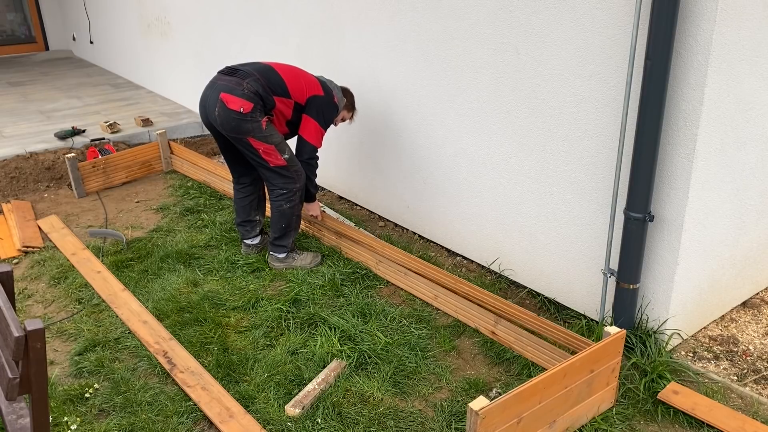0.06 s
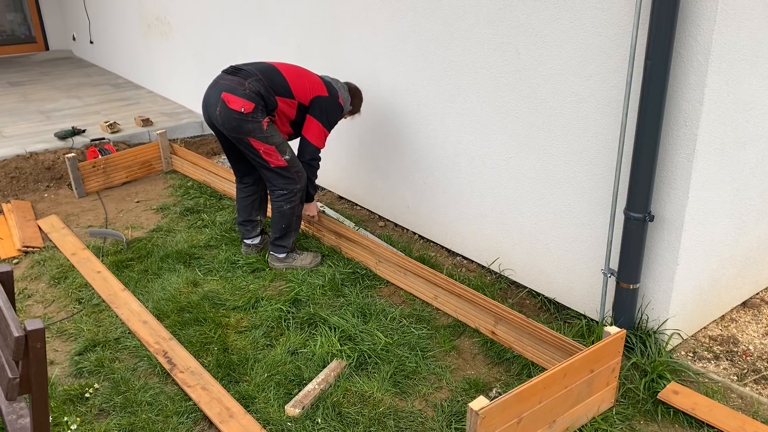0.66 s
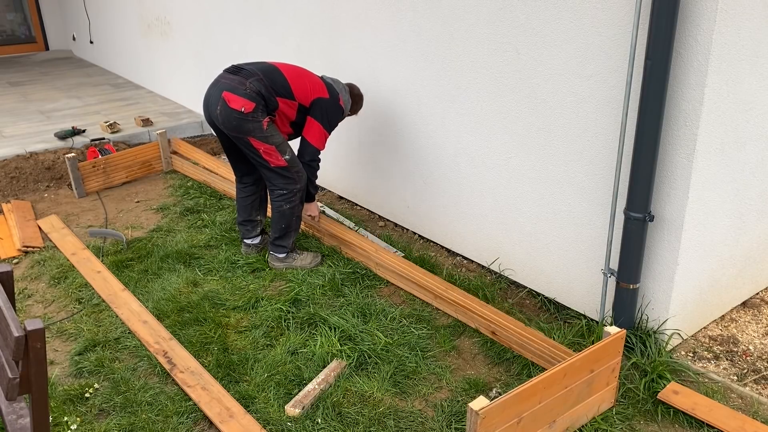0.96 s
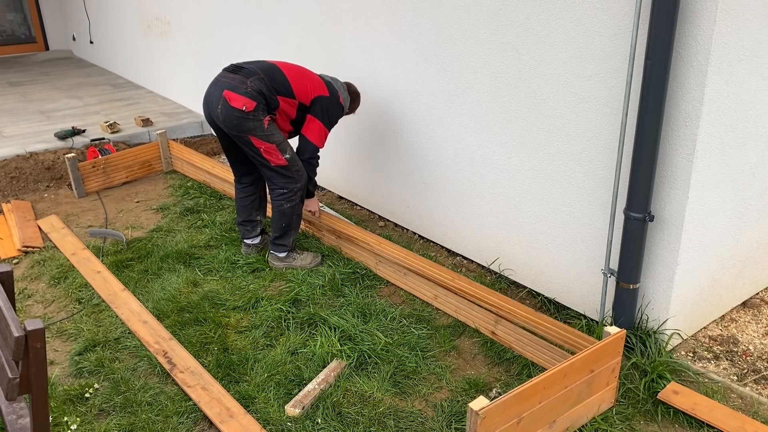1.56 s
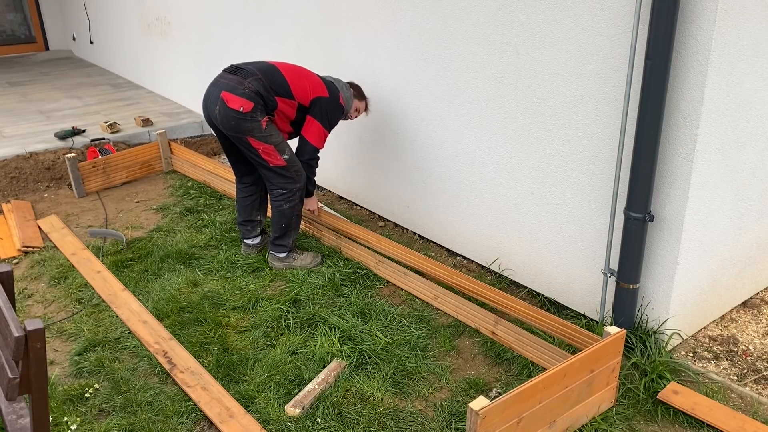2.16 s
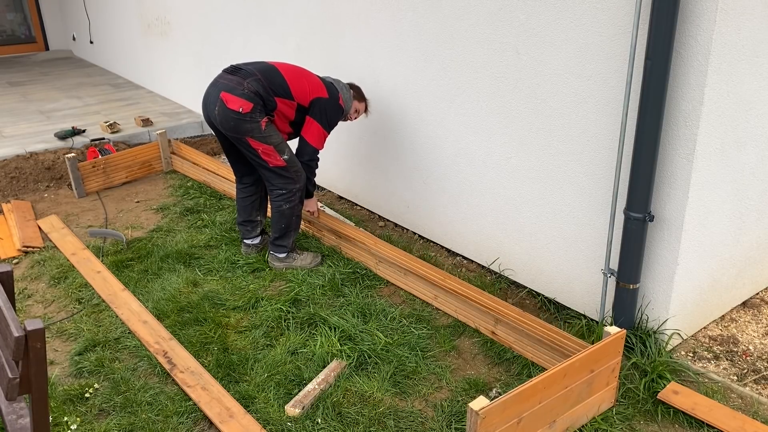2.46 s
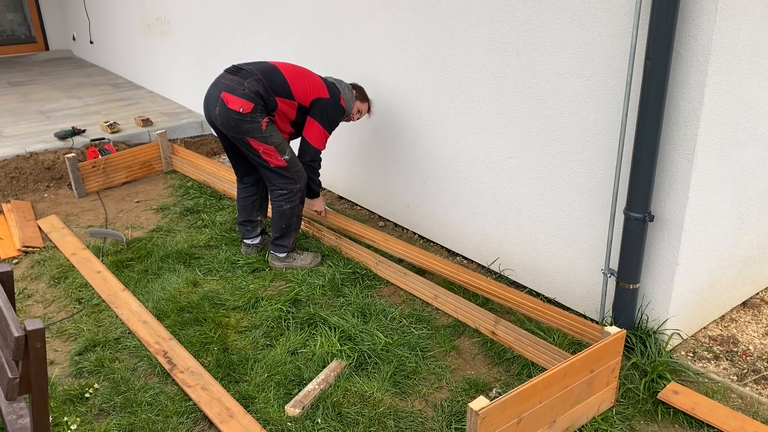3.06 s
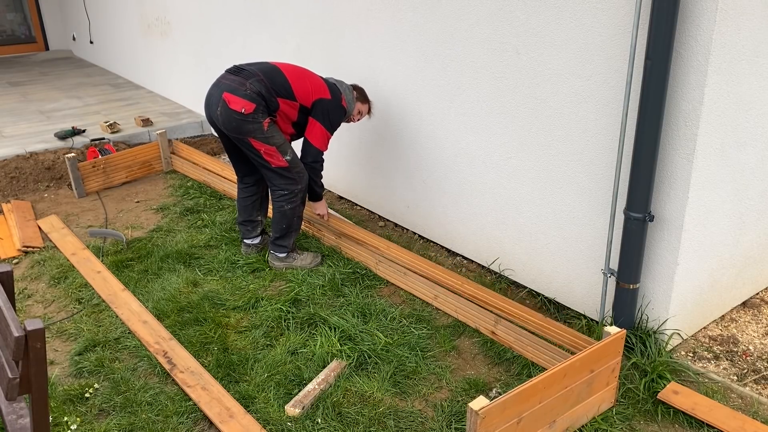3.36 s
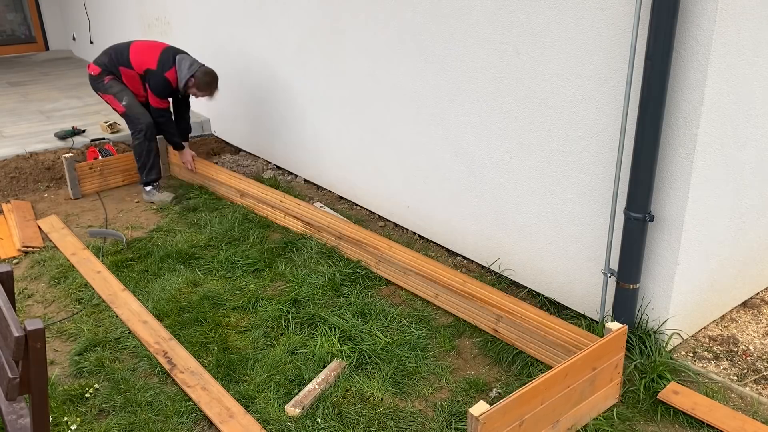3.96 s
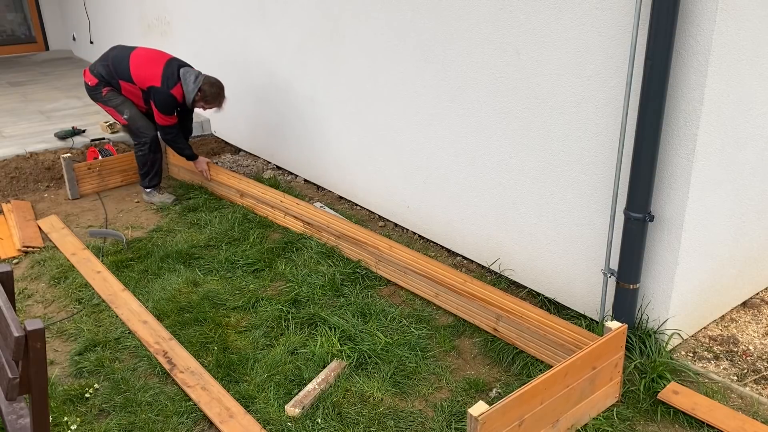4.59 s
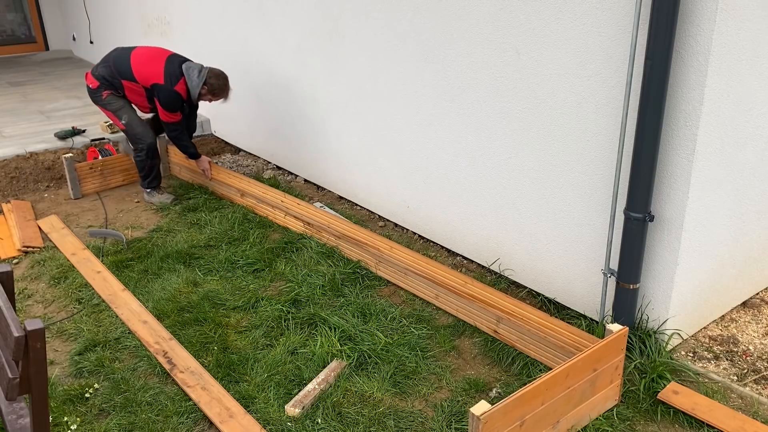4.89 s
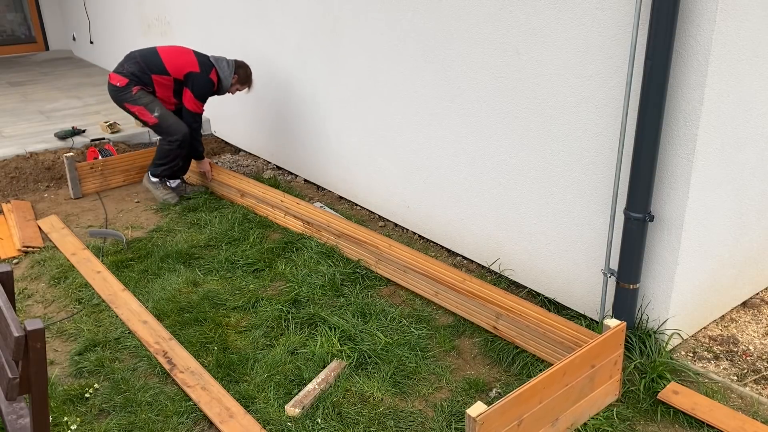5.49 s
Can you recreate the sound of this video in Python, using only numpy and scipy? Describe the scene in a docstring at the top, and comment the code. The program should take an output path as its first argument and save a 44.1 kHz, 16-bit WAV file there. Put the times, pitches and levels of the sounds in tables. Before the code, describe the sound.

A wooden plank scrapes, knocks and slaps against other boards outdoors, then clothes rustle over a low hum and distant traffic.

```python
"""On a lawn beside a house wall, a long wooden plank is slid and knocked into a garden frame.
It scrapes and squeaks as it sticks and slips, rattles against the other boards, slaps down and lands.
Each bump makes the wood ring, and the wall and yard echo it. After a brief dip in level, work clothes
and grass rustle while a machine hums nearby. Far traffic hisses and rumbles throughout."""
import sys
import numpy as np
from scipy import signal
from scipy.fft import rfft, irfft
from scipy.io import wavfile

SR = 44100
rng = np.random.default_rng(int(sys.argv[2]) if len(sys.argv) > 2 else 0)


def materialize(psi):
    """Save the field psi as 16-bit PCM at rate SR to the path in sys.argv[1].

    A 1-D psi becomes a single channel; in a 2-D psi each row is a channel.
    """
    bounded = np.clip(np.atleast_2d(psi).T, -1, 1)
    quanta = np.round(bounded * 32767).astype(np.int16)
    wavfile.write(sys.argv[1], SR, quanta)


N = 248283
TIME = np.arange(N) / SR
DIP_S, DIP_FADE_S, DIP_DB = 3.945, 0.043, -22  # the level dips briefly here; hum and rustle follow
CRISP_HZ = 8650  # the crisp top treble starts here

# Bumps on other boards: t/s, level/dB, top f/Hz, bottom f/Hz, clack share (0-1), first bounce/dB
PLANK_BUMPS = [(.111, -35, 300, 150, 0.3, -7.5), (.238, -38.5, 418, 160, 0.4, -3),
               (.268, -38, 397, 119, 0.5, -3), (.293, -32.5, 190, 110, 0.46, -7),
               (.318, -35.5, 900, 141, 0.07, -14), (.352, -39.5, 348, 160, .2, -11),
               (.414, -38, 500, 200, 0.14, -4), (.712, -25.5, 160, 72, .5, -12),
               (.746, -33, 800, 130, .05, -4), (1.028, -27.5, 1100, 260, 0.03, -13),
               (1.047, -27, 564, 270, 0.3, -20), (1.199, -35.5, 910, 220, .05, 1),
               (1.418, -33, 260, 199, .35, -20), (1.474, -45, 480, 380, .1, -6),
               (3.208, -42, 280, 190, .35, -10)]
# Notes the plank rings at as it bends and twists (wider ones die sooner): f/Hz, width/Hz, level/dB
PLANK_NOTES = [(68, 39, 2), (88, 28, 7.5), (165, 44, 1.5), (199.3, 27.5, 4), (230, 40, 3), (276, 50, 2.5),
               (336, 35, 1), (384, 25, 2.5), (473.5, 38, 0.5), (549, 49, -7), (601, 17, -7.5),
               (648, 15, -9.5), (700, 67, -10), (812, 38, -6), (875, 30, -0.5), (932, 32, -3),
               (1033, 24, -2), (1094, 45, -0.5), (1256, 51, -6.5), (1317, 60, -2), (1370, 78, -6.5),
               (1650, 93, -1), (1790, 110, -5), (2040, 110, -6), (2600, 180, -15)]
KNOCK_TRAVEL_MS = 0.53  # time a 1 kHz wave takes along the plank
def plank_knocks(gap_s=0.0235, loss_db=6.0, softening=0.58):
    """The plank bumps and bounces, each bounce weaker and duller than the last; slaps ring it too."""
    touches = []
    for s, db, top_hz, low_hz, clack_share, bounce_db in PLANK_BUMPS:
        touches.append((s, db, top_hz, low_hz, clack_share))
        for k in range(3):
            bounce_s = s + gap_s * (k + 1 + rng.uniform(-0.13, 0.118))
            duller_hz = top_hz * softening ** (k + 1)
            touches.append((bounce_s, db + bounce_db - loss_db * k, duller_hz, low_hz, clack_share))
    # just after a slap the plank rings between 297 and 1480 Hz
    touches += [(s + 0.006, ring_db, 1480, 297, 0) for s, _, ring_db in END_SLAPS]
    return knocks(touches, PLANK_NOTES, KNOCK_TRAVEL_MS, chatter_db=-9, chatter_s=0.068)


# The far end slaps down: t/s, crack level/dB, ringing level/dB
END_SLAPS = [(0.9844, -17, -24), (1.8195, -39, -36)]
# Tone of the crack: f/Hz, level/dB
SLAP_TONE = [(150, -20), (250, 1.5), (360, 5), (550, -4), (780, -6), (1050, -4.5), (1450, -0.5), (1900, -4),
             (2400, -17), (2900, -26.5), (3400, -47), (6000, -64)]
def slaps(return_db=-12, ringing_db=-4.0, size=8192):
    """A crack runs along the plank as a falling chirp, comes back once, weaker, and rings the wood."""
    out, hz = np.zeros(N), frequencies(size)
    paths = bending(hz, travel_ms=8.0) + from_db(return_db) * bending(hz, travel_ms=21)
    chirp = irfft(from_db(at_hz(SLAP_TONE, hz)) * paths, size)[:size // 2]
    chirp = butter(chirp, 150, "high")
    ring = resonate(chirp, PLANK_NOTES)
    crack = as_blow(as_blow(chirp) + from_db(ringing_db) * as_blow(ring))
    for s, crack_db, _ in END_SLAPS:
        add(out, s, from_db(crack_db) * crack)
    return out


# The plank touches down in the frame: t/s, level/dB, top f/Hz, bottom f/Hz, clack share (0-1)
FRAME_LANDINGS = [(3.173, -38.5, 383, 190, 0.2), (3.184, -32.5, 130, 45, 0.25),
                  (3.188, -41, 1200, 600, 0.12), (3.766, -27, 754, 560, .4), (3.7751, -21, 480, 400, .12),
                  (3.7835, -22, 420, 170, 0.3), (3.791, -32.5, 1600, 950, 0.15), (3.8, -30, 480, 140, 0.5),
                  (3.822, -34.5, 450, 220, .6), (3.833, -33.5, 260, 150, .5), (3.852, -37, 640, 380, .1),
                  (3.864, -43, 170, 70, .5), (3.884, -48, 250, 100, .6)]
# Notes of the frame boards resting on the ground: f/Hz, width/Hz, level/dB
FRAME_NOTES = [(63, 14, 8.5), (161, 23, 4.5), (244, 57, -1.5), (287, 32, 3.5), (381, 28, -1), (438, 81, -3),
               (488, 58, 2), (588, 26, -3.5), (656, 40, -9), (820, 91, -10), (876, 48, -9), (949, 35, -3.5),
               (1075, 35, -18), (1226, 74, -9), (1396, 76, -17), (1590, 45, -6), (1950, 150, -22),
               (2320, 550, -17)]
def frame_knocks():
    """The plank lands on a corner, an edge, then its face; waves cross the short frame boards fast."""
    return knocks(FRAME_LANDINGS, FRAME_NOTES, travel_ms=0.14, chatter_db=-15, chatter_s=0.05)


# The plank hits the board beside it: t/s, level/dB, top f/Hz, bottom f/Hz
BOARD_HITS = [(.997, -33, 620, 280), (1.046, -35.5, 1000, 330), (1.222, -45, 600, 220),
              (1.417, -46, 400, 300), (1.492, -47, 650, 453)]
# Notes of that board: f/Hz, width/Hz, level/dB
BOARD_NOTES = [(229, 9, -3), (341, 16, -1), (382, 8, 3), (486, 11, -2), (597, 8, -1), (652, 8, 1),
               (690, 16, -2), (808, 14, -6), (878, 10, -5), (1032, 14, -1), (1088, 18, -3), (1323, 24, 3),
               (1664, 40, 1)]
def board_knocks():
    """The board standing on edge beside the plank rings on after it is hit."""
    touches = [(*hit, 0) for hit in BOARD_HITS]  # all ring, no clack
    return knocks(touches, BOARD_NOTES, KNOCK_TRAVEL_MS, chatter_db=-17, chatter_s=0.03)


# Pushes of wood over wood: peak t/s, hiss level/dB, rise/s, fall/s, judder above hiss/dB, deep share (0-1)
PLANK_PUSHES = [(0.263, -50.5, 0.19, 0.18, 4.5, 0.84), (0.429, -48.5, 0.05, 0.18, -5, 0.25),
                (.70, -50, 0.061, 0.052, -9, 0.05), (0.756, -48.5, 0.083, 0.084, 6.5, 0.91),
                (1.04, -49.5, 0.037, 0.11, -15, .5), (1.105, -51, 0.11, 0.1, -24, 0.9),
                (1.224, -54, 0.048, 0.055, 10.5, 0.76), (1.34, -58.5, 0.074, 0.15, 3.5, 0.32),
                (2.195, -52.5, 0.11, 0.13, -6.5, 0.5), (3.05, -62.5, 0.23, 0.16, 5, 0.15),
                (3.205, -54.5, 0.038, 0.091, 0.5, 0.67), (3.54, -67.5, 0.52, 0.14, -5, 0.1),
                (3.73, -57.5, 0.08, .04, -1, 0.4), (3.785, -45.5, 0.029, 0.099, 6, 0.95)]
# An edge catches and creaks: middle t/s, half length/s, level/dB, bottom f/Hz
EDGE_CREAKS = [(0.175, 0.0052, -46, 1400), (0.238, .008, -47, 1200), (0.26, .009, -50, 1400),
               (0.318, 0.01, -50, 900), (.415, .007, -53.5, 1100), (0.443, .008, -53, 1100),
               (0.663, .005, -53, 1510), (.687, .006, -45, 990), (0.722, .004, -49, 910),
               (0.754, 0.0094, -43, 1000), (1.336, 0.015, -55, 1400), (2.149, 0.033, -54.5, 1290),
               (2.21, 0.02, -54.5, 1900), (3.043, 0.046, -62.5, 1400), (3.779, .008, -42.5, 1200),
               (3.835, 0.011, -54, 700), (4.026, 0.013, -56, 1190), (5.026, .005, -48.5, 1000),
               (5.54, .045, -55.5, 1410)]
# Notes of the scraped edge: f/Hz, width/Hz, level/dB
EDGE_NOTES = [(1070, 18, -4), (1394, 330, 0.5), (1705, 67, 3), (1883, 147, 0), (2595, 113, -5),
              (2720, 76, -12.5), (2946, 82, -8.5), (3210, 230, -15.5)]
def scrapes():
    """Sticking and slipping rings the edge; under weight the whole plank joins in with a deep judder."""
    light, heavy = tiny_slips(per_s=330, size_db=3.5, hiss=0.14)
    heavy = butter(butter(heavy, 380, "low", order=1), 120, "high")
    bright = butter(light, 960, "high")
    edge_force, deep_force = np.zeros(N), np.zeros(N)
    for s, db, rise_s, fall_s, judder_db, deep_share in PLANK_PUSHES:
        judder = from_db(db + judder_db) * stroke(s, rise_s, fall_s) ** 1.22  # grows faster than the hiss
        edge_force += np.sqrt(1 - deep_share) * judder * bright
        deep_force += np.sqrt(deep_share) * judder * heavy
    catching, _ = tiny_slips(per_s=1100, size_db=2.0, hiss=0.067)
    for s, half_s, db, low_hz in EDGE_CREAKS:
        swell = np.exp(-np.minimum(((TIME - s) / half_s) ** 2, 40) / 2)
        edge_force += from_db(db) * swell * butter(catching, low_hz, "high")
    edge_force = butter(edge_force, 4200, "low", order=4)  # soft wood rounds off each slip
    edge = resonate(edge_force, EDGE_NOTES) / np.std(resonate(light, EDGE_NOTES))
    body = resonate(deep_force, PLANK_NOTES) / np.std(resonate(heavy, PLANK_NOTES))
    return edge + body


# Tone of wood sliding on wood: f/Hz, level/dB
SLIDE_TONE = [(200, 25), (500, 15.5), (1000, 20), (1800, -1), (2700, 5), (4000, 0.5), (7200, 1),
              (9000, -25), (10600, -8.5), (13200, -12), (15000, -34)]
def sliding():
    """The hiss of rubbing wood follows each push."""
    power = sum((from_db(db) * stroke(s, rise_s, fall_s)) ** 2
                for s, db, rise_s, fall_s, *_ in PLANK_PUSHES)
    return rubbing(SLIDE_TONE, waver_db=2.0, per_s=1200, size_db=0.5, hiss=1.0) * np.sqrt(power)


# A tight corner squeaks: middle t/s, half length/s, level/dB, f/Hz
CORNER_SQUEAKS = [(0.231, 0.0043, -44, 1750), (.559, 0.0038, -54, 2500), (0.691, 0.0081, -47, 1330),
                  (.743, 0.0039, -53, 2580), (.765, 0.01, -49, 2690)]
# Notes in a squeak: multiple of its pitch, width/Hz, level/dB
SQUEAK_NOTES = [(1, 220, 1), (1.17, 300, -8)]
def squeaks(slip_hz=440, wobble=0.4):
    """A tight corner slips fast and unevenly, and rings at a pitch set by where it jams."""
    cycles = np.cumsum(slip_hz * (1 + wobble * drift(120))) / SR
    slips = np.diff(np.floor(cycles), prepend=0) * from_db(3.2 * drift(200))  # one click a cycle
    out = np.zeros(N)
    for s, half_s, db, hz in CORNER_SQUEAKS:
        notes = [(hz * multiple, width, note_db) for multiple, width, note_db in SQUEAK_NOTES]
        ring = rms_one(butter(resonate(slips, notes), [0.75 * hz, 1.3 * hz], "band"))
        swell = np.exp(-np.minimum(((TIME - s) / half_s) ** 4, 40))
        out += from_db(db) * swell * ring
    return out


# Splinters and grit snap: t/s, level/dB, extra top treble/dB
SPLINTER_SNAPS = [(.172, -53, -6), (0.247, -60, -4), (.304, -62, -3), (.335, -64, 7), (0.448, -60, -5),
                  (.556, -51.5, -17), (0.721, -44.5, 1), (.994, -51, 8), (1.033, -53, 8), (1.415, -59.5, 3),
                  (3.2, -60, 5), (3.767, -41.5, -5), (3.7916, -46, 9), (4.942, -63, 10), (5.028, -57, -6),
                  (5.205, -58.5, 14), (5.422, -65, 17)]
# Tone of a snap: f/Hz, level/dB
SNAP_TONE = [(1500, -15), (2800, 12.5), (5000, 5.5), (7000, 10), (9000, -15.5), (12000, 0.5), (15500, -23)]
def snaps(fade_s=0.034, rise_s=0.001097, size=4096):
    """Short bright cracks where edges catch; the smallest splinters are the crispest."""
    out, t = np.zeros((2, N)), TIME[:size]
    for s, db, crisp_db in SPLINTER_SNAPS:
        tone = [(hz, tone_db + crisp_db * (hz > CRISP_HZ)) for hz, tone_db in SNAP_TONE]
        crack = spread(rng.standard_normal((2, size)), tone, NEARBY_WIDTH)
        add(out, s - rise_s, crack * from_db(db - 60 * t / fade_s) * (1 - np.exp(-t / rise_s)))
    return out


# Swishes of clothes and grass: peak t/s, level/dB, rise/s, fall/s, extra top treble/dB
CLOTH_SWISHES = [(3.968, -64, 0.069, .09, -2), (4.038, -58, 0.056, 0.11, -1), (4.10, -63.5, .07, .11, -3),
                 (4.29, -62, 0.13, .14, 0), (4.378, -58, 0.15, 0.088, 6.5), (4.705, -58, 0.15, 0.12, 2),
                 (4.775, -58.5, 0.084, 0.12, -16), (4.958, -61, .025, 0.088, 8),
                 (4.992, -62.5, 0.071, 0.14, 15.5), (5.028, -53, 0.055, 0.11, -2),
                 (5.103, -58.5, 0.11, 0.12, 4), (5.34, -64.5, 0.33, 0.12, -5), (5.43, -62, 0.15, 0.14, 7.5),
                 (5.515, -57.5, 0.064, 0.16, 6.5), (5.575, -70.5, 0.081, 0.088, 18),
                 (5.625, -60.5, 0.049, .1, 11)]
# Tone of the rustle: f/Hz, level/dB
RUSTLE_TONE = [(500, -45), (1800, 18.5), (3000, 9.5), (4500, 1.5), (7000, 2), (9000, -23), (10600, -5.5),
               (12000, -3.5), (13700, -8), (15200, -32)]
def rustling(stir_db=-73):
    """Cloth and grass swish with each movement, crispest where it is fastest."""
    soft_power = (from_db(stir_db) * (TIME > DIP_S)) ** 2  # faint rustle between the swishes
    crisp_power = 0
    for s, db, rise_s, fall_s, crisp_db in CLOTH_SWISHES:
        speed = stroke(s, rise_s, fall_s)
        soft_power += (from_db(db) * speed) ** 2
        crisp_power += (from_db(db + crisp_db) * speed ** 1.18) ** 2
    fibres = rubbing(RUSTLE_TONE, waver_db=1.5, per_s=1500, size_db=1.8, hiss=0.85)
    soft = butter(fibres, CRISP_HZ, "low", order=4) * np.sqrt(soft_power)
    crisp = butter(fibres, CRISP_HZ, "high", order=4) * np.sqrt(crisp_power)
    return soft + crisp


def wall_echo(x, delay_s=0.00367, echo_db=-13.0, low_hz=424):
    """The house wall throws the sound back from the side."""
    late = np.interp(TIME - delay_s, TIME, butter(x, low_hz, "high", order=1))
    return from_db(echo_db) * late * np.array([[1], [-1]])


# How long the yard echoes: f/Hz, time to fade by 60 dB/s
YARD_FADE = [(100, 0.47), (400, 0.29), (1000, 0.19), (2500, 0.096), (10000, 0.098)]
# Stereo width of nearby sounds and their echoes: f/Hz, side above middle/dB
NEARBY_WIDTH = [(100, -10.5), (250, -13), (700, -4.5), (1300, -8.5), (2400, -5), (4400, -2.5), (7200, -7),
                (9000, 0), (11000, -14)]
def yard_echoes(x, echo_db=-10.5, build_s=0.004, size=24000):
    """Echoes from the walls and fence gather after a blow and die away, the treble first."""
    t, edges_hz = TIME[:size], np.geomspace(50, 15000, 11)
    noise = spread(rng.standard_normal((2, size)), [(50, 0), (15000, 0)], NEARBY_WIDTH)
    tail = 0
    for low, high in zip(edges_hz, edges_hz[1:]):
        fade_s = at_hz(YARD_FADE, np.sqrt(low * high))
        tail += butter(noise, [low, high], "band") * from_db(-60 * t / fade_s)
    tail = rms_one(tail * (1 - np.exp(-t / build_s))) / np.sqrt(size)
    return from_db(echo_db) * signal.fftconvolve(x, tail, axes=1)[:, :N]


# Tones of the machine: f/Hz, level/dB
HUM_TONES = [(53.8, -52), (67.3, -64), (134.6, -55), (202, -70.5)]
def machine_hum():
    """A fan and a compressor turn at different speeds; their low tones throb from the dip onwards."""
    tones = sum(from_db(db + 0.5 * drift(7.2)) * np.sin(2 * np.pi * hz * TIME + 0.1 * drift(1.8))
                for hz, db in HUM_TONES)
    return np.sqrt(2) * tones * (TIME > DIP_S)


# Tone of the traffic rumble: f/Hz, level/dB
RUMBLE_TONE = [(22, -11), (33, -15), (45, 11), (58, 9), (90, 9.5), (120, -2.5), (170, -6.5), (300, -62.5)]
# Rumble between surges, before the dip: t/s, level/dB
RUMBLE_BASE = [(0.0, -55.5), (0.47, -50.5), (1.76, -50.5), (2.16, -48), (2.79, -52), (3.17, -51.5),
               (3.56, -56.5), (3.9, -49)]
# Tone of the tyre hiss: f/Hz, level/dB
TYRE_TONE = [(90, -28), (160, 1), (260, 2), (400, -2), (700, -1), (1200, -3), (1850, -1), (2500, -9.5),
             (3200, -17.5), (4300, -30), (7000, -40.5), (9000, -53), (12000, -50), (15000, -52)]
# Stereo width of the traffic: f/Hz, side above middle/dB
TRAFFIC_WIDTH = [(60, -13), (120, -7.5), (200, -5), (380, -4), (700, 7), (1290, 6), (2380, -7.5),
                 (4400, -4.5), (8000, 12), (13000, -1)]
def traffic(late_rumble_db=-55, surge_db=2.0, far_db=-61.5, near_db=-56.5, approach_s=3.22):
    """Far traffic rumbles in surges, and its tyre hiss swells as it comes nearer."""
    base_db = np.where(TIME < DIP_S, np.interp(TIME, *np.transpose(RUMBLE_BASE)), late_rumble_db)
    rumble_db = base_db + surge_db * np.abs(drift(1.8))
    nearness = (1 + np.tanh(TIME - approach_s)) / 2
    tyres_db = far_db + (near_db - far_db) * nearness
    rumble = spread(rng.standard_normal((2, N)), RUMBLE_TONE, TRAFFIC_WIDTH)
    tyres = spread(rng.standard_normal((2, N)), TYRE_TONE, TRAFFIC_WIDTH)
    return rumble * from_db(rumble_db) + tyres * from_db(tyres_db + 0.74 * drift(22))


def knocks(touches, notes, travel_ms, chatter_db, chatter_s, chatter_per_s=700, size=16384):
    """Each touch clacks, chatters briefly and rings the wood; a harder one reaches a higher pitch."""
    out, t = np.zeros(N), TIME[:size]
    tap = signal.unit_impulse(size)
    each_note = np.array([(-1) ** k * resonate(tap, [note]) for k, note in enumerate(notes)])
    for s, db, top_hz, low_hz, clack_share in touches:
        # the spot that is struck favours some notes over others
        ringing = rfft(from_db(2.5 * rng.standard_normal(len(notes))) @ each_note)
        chatter = rng.standard_normal(size) * (rng.random(size) < chatter_per_s / SR)
        force = tap + chatter * from_db(chatter_db - 60 * t / chatter_s)
        wave = rfft(force) * bending(frequencies(size), travel_ms)
        clack_and_ring = irfft(np.array([wave, wave * ringing]), size)
        clack, ring = butter(butter(clack_and_ring, top_hz, "low"), low_hz, "high")
        clack = butter(butter(clack, top_hz, "low"), low_hz, "high", order=1)
        blow = np.sqrt(clack_share) * as_blow(clack) + np.sqrt(1 - clack_share) * as_blow(ring)
        add(out, s, from_db(db) * blow)
    return out


def resonate(force, notes):
    """A force rings all the notes of an object at once; every second one is flipped in sign."""
    out = 0
    for k, (hz, width, db) in enumerate(notes):
        r = np.exp(-np.pi * width / SR)  # share of the swing left after one sample
        poles = [1, -2 * r * np.cos(2 * np.pi * hz / SR), r * r]
        out += (-1) ** k * from_db(db) * (1 - r * r) / 2 * signal.lfilter([1, 0, -1], poles, force)
    return out


def bending(hz, travel_ms):
    """A bending wave carries the treble ahead of the bass; 1 kHz takes the given time."""
    return np.exp(-4j * np.pi * travel_ms * np.sqrt(hz / 1000))


def tiny_slips(per_s, size_db, hiss):
    """Two streams of tiny slips of uneven size over a smooth hiss."""
    sizes = from_db(size_db * np.minimum(rng.exponential(1, (2, N)), 4)) * rng.choice([-1, 1], (2, N))
    slips = sizes * (rng.random((2, N)) < per_s / SR)
    return rms_one(slips) + hiss * rng.standard_normal((2, N))


def rubbing(tone, waver_db, per_s, size_db, hiss):
    """A crowd of tiny slips whose strength wavers as the surfaces catch."""
    return spread(tiny_slips(per_s, size_db, hiss), tone, NEARBY_WIDTH) * from_db(waver_db * drift(41))


def stroke(peak_s, rise_s, fall_s, range_db=19.5):
    """One movement swells to 1 and dies away, changing by range_db over its rise and its fall."""
    away = np.maximum((peak_s - TIME) / rise_s, (TIME - peak_s) / fall_s)
    return from_db(-range_db * np.minimum(away, 10))


def spread(pair, tone, width):
    """Shape two unrelated noises into a middle and a side; return left and right."""
    size = pair.shape[1]
    hz = frequencies(size)
    shaped = rfft(pair) * from_db(at_hz(tone, hz))
    middle = irfft(shaped[0], size)
    side = irfft(shaped[1] * from_db(at_hz(width, hz)), size)
    return np.array([middle + side, middle - side]) / np.std(middle)


def drift(rate_hz):
    """A random wander of typical size 1, mostly slower than the given rate."""
    return rms_one(irfft(rfft(rng.standard_normal(N)) / (1 + (frequencies(N) / rate_hz) ** 2), N))


def butter(x, hz, kind, order=2):
    """Filter that keeps the lows, the highs or a band."""
    sections = signal.butter(order, np.clip(hz, 10, SR / 2 - 500), kind, fs=SR, output="sos")
    return signal.sosfilt(sections, x)


def frequencies(size):
    """The frequencies in Hz that make up a sound of this many samples."""
    return np.arange(size // 2 + 1) * SR / size


def at_hz(points, hz):
    """Read between the rows of a table, with octaves evenly spaced."""
    f, value = np.transpose(points)
    return np.interp(np.log(np.maximum(hz, 1)), np.log(f), value)


def from_db(db):
    """Turn decibels into a multiplier."""
    return 10 ** (np.asarray(db) / 20)


def rms_one(x):
    """Scale to a typical size (rms) of 1."""
    return x / np.sqrt(np.mean(x ** 2) + 1e-20)


def as_blow(x):
    """Scale a blow so that its energy, spread over 3 ms, has rms 1."""
    return x / np.sqrt(np.sum(x ** 2) / (0.003 * SR))


def add(out, s, sound):
    """Mix a short sound in at s seconds."""
    start = int(s * SR)
    out[..., start:start + sound.shape[-1]] += sound[..., :N - start]


def scene(left_lag_s=0.000016, tilt_db=0.92):
    """The work in front of traffic and hum, a little earlier and stronger on the right."""
    wood = plank_knocks() + slaps() + frame_knocks() + board_knocks() + scrapes() + squeaks()
    stereo_wood = wood + wall_echo(wood) + snaps()
    left, right = stereo_wood + yard_echoes(stereo_wood) + sliding() + rustling()
    delay = np.exp(-2j * np.pi * left_lag_s * frequencies(N))
    work = np.array([irfft(rfft(left) * delay, N), right])
    dip = np.clip(np.abs(TIME - DIP_S) / DIP_FADE_S, from_db(DIP_DB), 1)
    return (work + traffic() + machine_hum()) * dip * from_db([[-tilt_db], [tilt_db]])


def record(dry):
    """The very highest treble is cut steeply, 60 dB down by 16 kHz."""
    return signal.sosfilt(signal.cheby2(14, 60, 16000, fs=SR, output="sos"), dry)


dry = scene()
out = record(dry)
materialize(out)
```